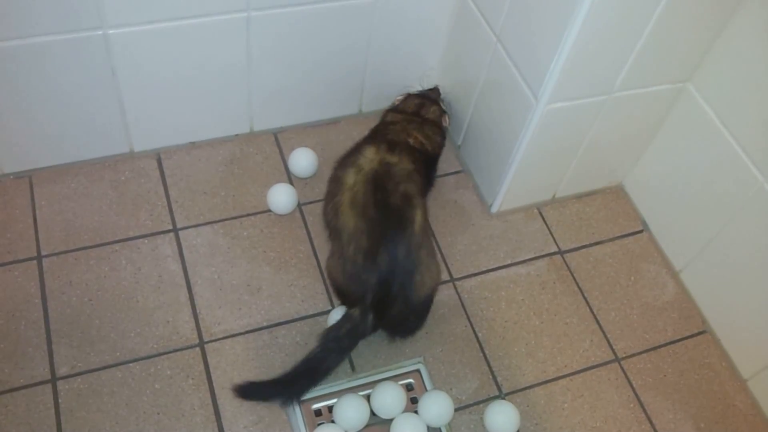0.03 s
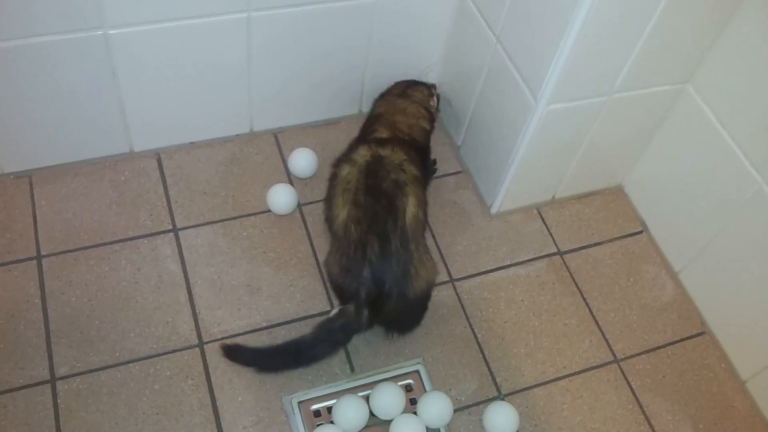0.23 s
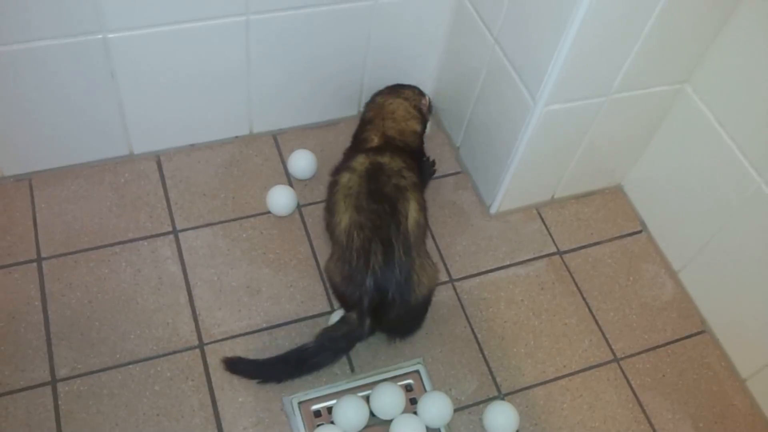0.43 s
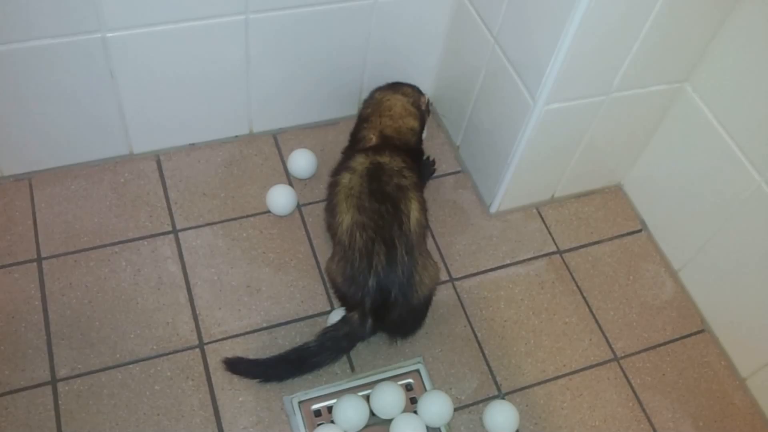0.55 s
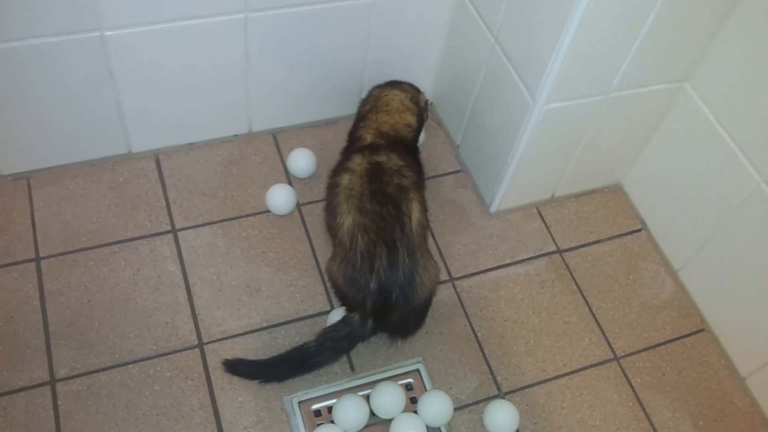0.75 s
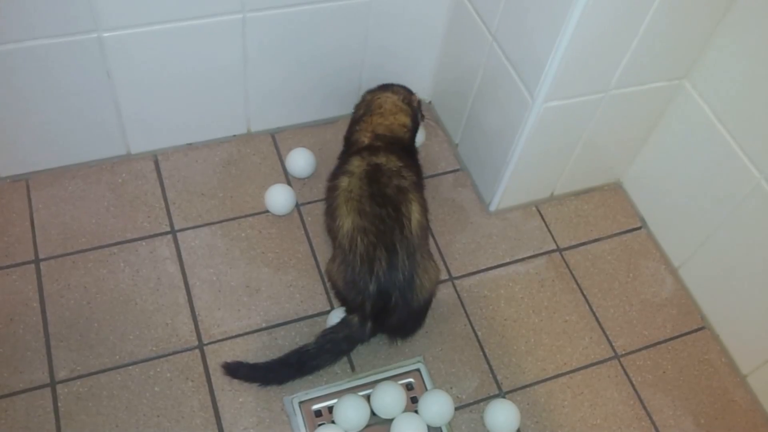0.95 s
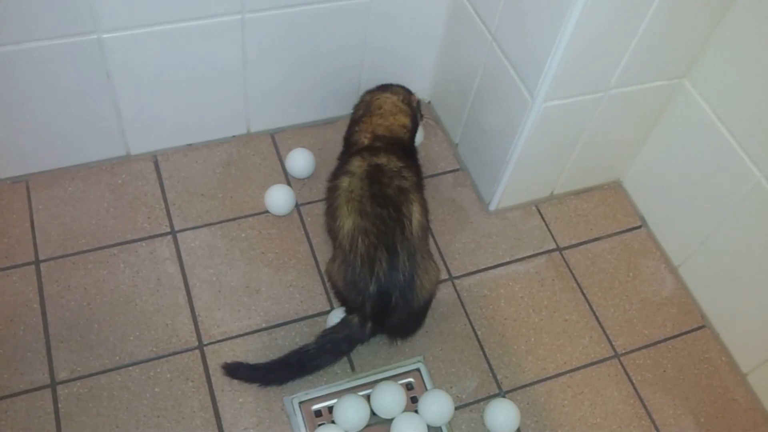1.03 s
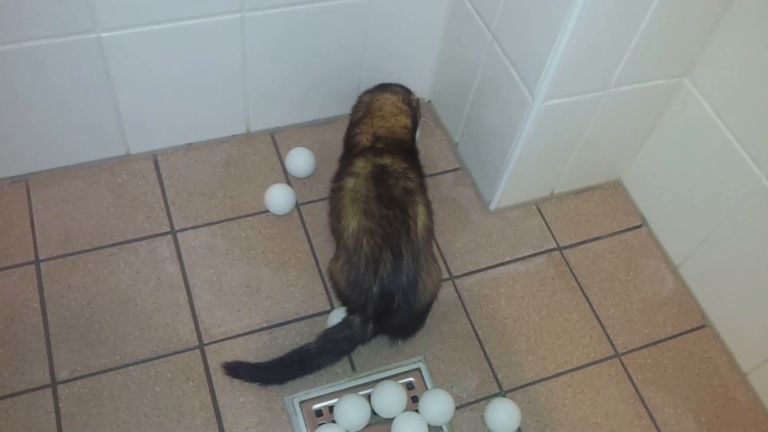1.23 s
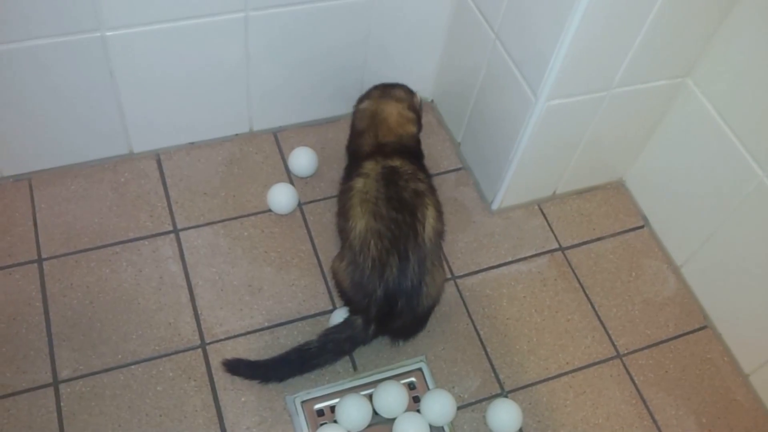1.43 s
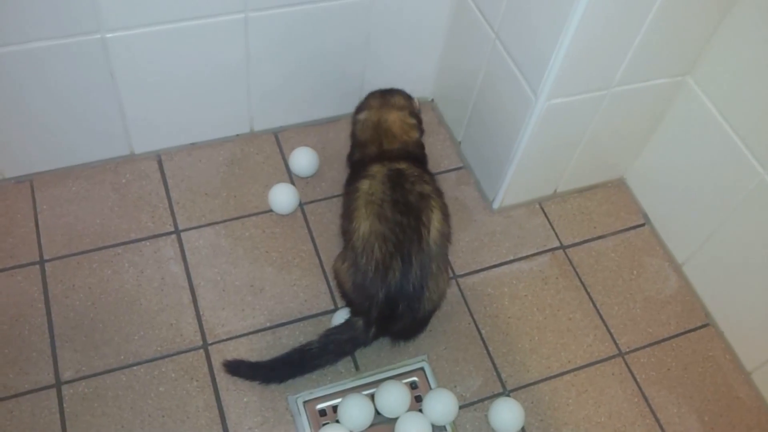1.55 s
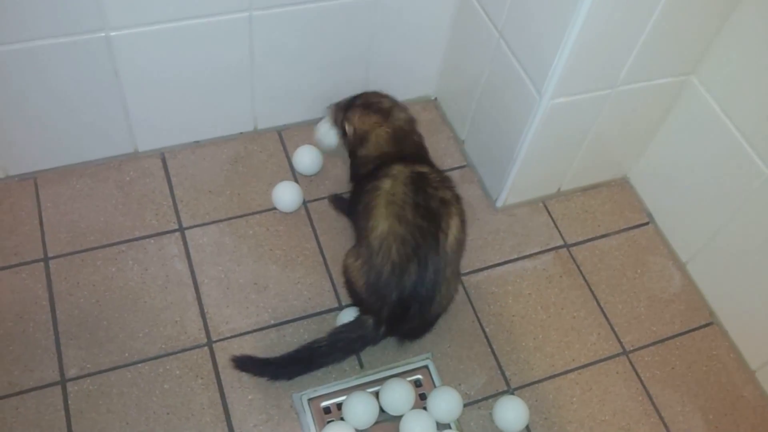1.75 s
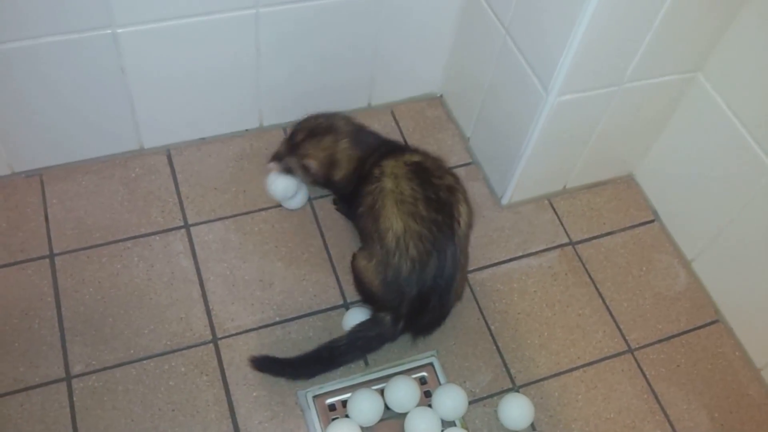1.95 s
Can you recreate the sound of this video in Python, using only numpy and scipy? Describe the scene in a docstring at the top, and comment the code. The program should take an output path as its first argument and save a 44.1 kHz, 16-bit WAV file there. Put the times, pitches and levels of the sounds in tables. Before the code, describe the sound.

A ping-pong ball clacks on tiles in an echoing room, with light claw scratching between hits.

```python
"""A ferret and a ping-pong ball

A ferret paws at the hollow ball in the corner of a small tiled room. The ball clacks on wall and
floor, twice very hard, and rolls a little; claws scratch and paws rub on the tiles in between.
The room rings brightly, and the two unequal microphone openings overload on the hard clacks."""
import sys
import numpy as np
from scipy import signal
from scipy.fft import rfft, irfft, next_fast_len
from scipy.io import wavfile

SR = 44100
rng = np.random.default_rng(int(sys.argv[2]) if len(sys.argv) > 2 else 0)


def waveform_to_disk(signal):
    """Save audio, clipped to [-1, 1], as 16-bit WAV at the path in sys.argv[1]."""
    frames = np.transpose(np.atleast_2d(signal))
    scaled = np.clip(frames, -1, 1) * 32767
    samples = np.round(scaled).astype(np.int16)
    wavfile.write(sys.argv[1], SR, samples)


N = 88200

# The ball's hollow note against the tiles. Each row: pitch in Hz, width in Hz, level in dB.
HOLLOW_NOTE = [(1132, 153, 49), (1420, 400, -19)]


def ball_clacks():
    """Each hit on the tiles is its own mix of hollow knock, ringing shell, dull tap and bright click."""
    # Each row: start in seconds, knock in dB, shell in dB, tap in dB, tap pitch in Hz, click in dB,
    # the click's treble tilt in dB per octave, direct sound (heard before any echo) in dB.
    hits = [(0.141, 10, -13, 10, 1260, 2, 5, -18.5), (0.2237, 27, 30, -10, 2570, 30, 2, -8.5),
            (0.7974, 28, 35.5, 32.5, 3840, 32, -5.5, -0.5), (0.8763, 2, 3, 11, 2500, 11, 2, -4),
            (0.91, -3, -6, 4, 2550, 14.5, -3, -1.5), (1.055, 1, -3, -1, 3470, -6, -7.5, -6),
            (1.1957, -12, -10, -5, 3040, -11, 11, 4), (1.2897, -16, 7, 10.5, 2170, 16.5, 12.5, -2.5),
            (1.333, -30, -14, -14.5, 2180, -1, 9, 3.5), (1.4313, -26, -10, 1, 1620, 6.5, 7, 0),
            (1.4382, -10, -6, 4.5, 4000, -21, 6, -4), (1.552, -23, -22, -5, 650, -13, 0, -27)]
    # The notes of the thin shell. Each row: pitch in Hz, width in Hz, level in dB.
    shell_notes = [(2450, 77, -33), (3408, 180, 5.5), (3767, 210, -3.5), (4710, 560, 2), (5410, 600, -3.5),
                   (5972, 84, -4.5), (7047, 210, -6.5)]
    # The tone of the tap and of the click. Each row: frequency in Hz, level in dB.
    tap_tone = [(100, -22), (400, -32), (800, -6.5), (1400, 5.5), (2000, -3), (2900, -3.5), (4200, -5),
                (6000, -33.5), (14000, -19.5)]
    click_tone = [(500, -74.5), (4000, -2), (6500, -10), (8000, -7), (9300, -0.5), (10400, 5.5), (12300, 2),
                  (14500, -16)]
    tap_width, tap_ring_db = 0.28, 1.5  # width as a share of the pitch; level against the dull pulse
    tilt_above_hz = 8000
    knock, shell, dull = ring(HOLLOW_NOTE), ring(shell_notes), pulse(tap_tone)
    click_fade = fade(np.arange(len(dull)) / SR, fade_s=0.0081)
    out = np.zeros((2, N))
    for start, knock_db, shell_db, tap_db, tap_hz, click_db, tilt_db, direct_db in hits:
        tilted = [(hz, db + tilt_db * np.log2(max(hz / tilt_above_hz, 1))) for hz, db in click_tone]
        click = through(rng.standard_normal(len(dull)) * click_fade, pulse(tilted))
        tap = dull + amp(tap_ring_db) * ring([(tap_hz, tap_width * tap_hz, 0)])
        parts = [(knock_db, knock), (shell_db, shell), (tap_db, tap), (click_db, click)]
        clack = sum(amp(db) * part / np.linalg.norm(part) for db, part in parts)
        add(out, start, signal.fftconvolve(clack, room_echo(direct_db), axes=1))
    return out


def claw_scratches():
    """Claws catch and slip on tile: a bright scuffing with short, stronger scratches."""
    # Single scratches. Each row: middle in seconds, half length in seconds, level in dB.
    strokes = [(0.402, 0.0076, -17), (0.497, .004, -17.5), (0.541, 0.0052, -15.5), (0.579, 0.0039, -13.5),
               (.718, 0.0058, -19), (.740, 0.0016, -13), (0.772, 0.0027, -23.5), (1.056, 0.0061, -18),
               (1.132, 0.0042, -19.5), (1.2877, 0.0017, -17)]
    # How strongly the claws scuff. Each row: time in seconds, level in dB.
    scuff_levels = [(0, -40.5), (.06, -44), (.12, -36), (.16, -37), (.28, -31), (.35, -16.5), (.45, -22.5),
                    (.6, -29), (.67, -26.5), (.76, -51), (.85, -18.5), (1.0, -32.5), (1.17, -72),
                    (1.3, -28), (1.48, -65), (1.62, -54), (2, -54)]
    # The tone of claw on tile. Each row: frequency in Hz, level in dB.
    claw_tone = [(500, -20.5), (3000, -24), (6300, -13.5), (7700, -10.5), (9300, -4), (11000, 6.5),
                 (12400, 0), (14500, -19)]
    pressure = sum(swell(middle, half_length, db) for middle, half_length, db in strokes)
    scratches = through(pressure * rng.standard_normal(N), room_echo(direct_db=-3.5))
    scuff = through(friction() * level_curve(scuff_levels), room_echo())
    return through(scuff + scratches, pulse(claw_tone))


def paw_rubs():
    """Soft paws rub the floor, with a few strokes that each have their own pitch."""
    # How strongly the paws rub. Each row: time in seconds, level in dB.
    rub_levels = [(0, -25.5), (.12, -57), (.17, -20), (.35, -20.5), (.6, -28), (.78, -34.5), (.95, -43),
                  (1.16, -23), (1.21, -23.5), (1.26, -84), (1.4, -33), (1.55, -41), (1.65, -50), (2, -45.5)]
    # The tone of paw on tile. Each row: frequency in Hz, level in dB.
    paw_tone = [(60, -70), (250, -24), (550, -1.5), (1100, 5), (1800, 4.5), (2500, -2.5), (3600, -0.5),
                (5000, -13), (7000, -38), (14000, -11)]
    # Single strokes. Each row: middle in seconds, half length in seconds, pitch in Hz, level in dB.
    strokes = [(0.161, 0.02, 1550, -19.5), (0.362, 0.037, 2490, -18.5), (0.59, 0.051, 670, -26),
               (0.746, 0.016, 900, -22), (1.2, 0.017, 3240, -18), (1.214, 0.015, 520, -29.5)]
    stroke_width = 0.33  # as a share of the pitch
    rub = through(friction() * level_curve(rub_levels), pulse(paw_tone))
    for middle, half_length, hz, db in strokes:
        slips = friction() * swell(middle, half_length, db)
        rub += through(slips, ring([(hz, stroke_width * hz, 0)]))
    return through(rub, room_echo())


def ball_rolling():
    """The rough tile keeps the rolling ball's hollow note going."""
    # How strongly the ball rumbles. Each row: time in seconds, level in dB.
    roll_levels = [(0, -47), (.13, -41), (.2, -41), (.5, -36), (.78, -25.5), (.95, -24.5), (1.07, -22),
                   (1.17, -40), (1.3, -71), (1.5, -73), (2, -76)]
    bumps = friction() * level_curve(roll_levels)
    return through(through(bumps, ring(HOLLOW_NOTE)), room_echo())


def room_echo(direct_db=-18.5, size=30000):
    """The room's stereo answer to a click: direct sound, a quick flutter in the corner, a long tail."""
    # How long the tiled room rings. Each row: frequency in Hz, seconds to fade by 60 dB.
    ring_times = [(150, 0.13), (1100, 0.84), (3500, 0.57), (7000, 0.51), (11000, 0.4), (15000, 0.44)]
    tail_db, flutter_db = -5, -2
    hz, t, bands = signal.stft(rng.standard_normal((2, size)), SR, nperseg=256)
    fading_bands = bands * fade(t, value_at(ring_times, hz)[:, None])
    tail = signal.istft(fading_bands, SR, nperseg=256)[1][:, :size]
    flutter = rng.standard_normal((2, size)) * fade(np.arange(size) / SR, fade_s=0.18)
    echo = amp(tail_db) * tail / np.linalg.norm(tail[0])
    echo += amp(flutter_db) * flutter / np.linalg.norm(flutter[0])
    echo[:, 0] += amp(direct_db)
    return echo


def background():
    """A steady hiss and a faint low hum."""
    # The tone of the hiss. Each row: frequency in Hz, level in dB.
    hiss_tone = [(18, -52), (30, -24), (128, -19), (145, -9), (226, -12), (398, -12), (477, -5),
                 (668, -12.5), (780, -10), (2140, -18), (2500, -18), (2840, -18), (14500, -19)]
    hiss_db, hum_db, hum_hz = -38, -65, 156.4
    hiss = unit(through(rng.standard_normal((2, N)), pulse(hiss_tone)))
    hum = np.sqrt(2) * np.sin(2 * np.pi * hum_hz * np.arange(N) / SR)
    return amp(hiss_db) * hiss + amp(hum_db) * hum


def friction(slips_per_s=1600, spread_db=4.5):
    """Surfaces rubbing together make many tiny slips of uneven size."""
    slips = rng.random(N) < slips_per_s / SR
    return unit(slips * rng.choice([-1, 1], N) * amp(spread_db * rng.standard_normal(N)))


def amp(db):
    """Turn decibels into a number to multiply a sound by."""
    return 10 ** (np.asarray(db) / 20)


def unit(x):
    """Scale a sound to an average strength (rms) of 1."""
    return x / np.sqrt(np.mean(x ** 2) + 1e-20)


def fade(t, fade_s):
    """Die away by 60 dB every fade_s seconds."""
    return amp(-60 * t / fade_s)


def swell(middle_s, half_length_s, db):
    """A smooth, bell-shaped rise and fall."""
    return amp(db) * np.exp(-((np.arange(N) / SR - middle_s) / half_length_s) ** 2)


def value_at(points, hz):
    """Read between (Hz, value) points, with octaves evenly spaced."""
    frequencies, values = np.transpose(points)
    return np.interp(np.log(hz + 1), np.log(frequencies + 1), values)


def level_curve(points):
    """Join (seconds, dB) points into a volume for every sample."""
    return amp(np.interp(np.arange(N) / SR, *np.transpose(points)))


def add(track, start_s, sound):
    """Mix a sound into the track at its start time."""
    part = track[..., round(start_s * SR):][..., :sound.shape[-1]]
    part += sound[..., :part.shape[-1]]


def through(x, response):
    """Pass a sound through a filter or echo, keeping its length."""
    return signal.fftconvolve(np.atleast_2d(x), np.atleast_2d(response), axes=1)[:, :x.shape[-1]]


def tone_filter(points, size=2048):
    """A filter whose tone follows (Hz, dB) points."""
    gains = amp(value_at(points, np.fft.rfftfreq(size, 1 / SR)))
    cepstrum = irfft(np.log(gains))
    # Fold the second half onto the first, so nothing sounds before the hit.
    cepstrum[1:size // 2] *= 2
    cepstrum[size // 2 + 1:] = 0
    return irfft(np.exp(rfft(cepstrum)))


def pulse(points):
    """A short pulse of energy 1 whose tone follows (Hz, dB) points."""
    response = tone_filter(points)
    return response / np.linalg.norm(response)


def ring(notes, size=2048):
    """Ringing of energy 1 from (Hz, width in Hz, dB) notes; narrower notes ring longer."""
    hz = np.fft.rfftfreq(size, 1 / SR)
    spectrum = sum((-1) ** k * amp(db) * 1j * hz * width / (pitch ** 2 - hz ** 2 + 1j * hz * width)
                   for k, (pitch, width, db) in enumerate(notes))
    ringing = irfft(spectrum)
    return ringing / np.linalg.norm(ringing)


def scene():
    """Ball and ferret as the two microphone openings hear them, over the background."""
    # The tone of each opening. Each row: frequency in Hz, level in dB.
    left_tone = [(1200, -4), (2700, -4.5), (4200, -7.5), (6400, -5), (8000, 6.5), (10000, 7), (14500, 8)]
    right_tone = [(1200, -6), (2700, -2.5), (4200, -2), (6400, -1.5), (8000, -2), (10000, -12),
                  (14500, -10.5)]
    openings = np.array([tone_filter(left_tone), tone_filter(right_tone)])
    play = ball_clacks() + claw_scratches() + paw_rubs() + ball_rolling()
    return through(play, openings) + background()


def record(dry):
    """The recorder clips loud peaks, briefly turns down volume and bass, and loses the top treble."""
    full_scale, top_hz = 0.89, 14600
    react_s, hold_s = 0.078, 0.073
    dip_db, dip_knee = 4.5, 0.093  # deepest dip; share of overloaded time that gives most of it
    bass_hz, most_bass_cut = 210, 0.73
    too_loud = np.mean(np.abs(dry) > full_scale, axis=0)
    # The recorder reacts a moment after an overload, then gradually forgets it.
    since_reacting = np.arange(SR // 2) / SR - react_s
    memory = (since_reacting > 0) * np.exp(-np.abs(since_reacting) / hold_s)
    overload = np.abs(through(too_loud, memory / memory.sum()))
    bass_cut = most_bass_cut * np.tanh(15 * overload)
    bass = signal.sosfiltfilt(signal.butter(4, bass_hz, fs=SR, output="sos"), dry)
    turned_down = (dry - bass_cut * bass) * amp(-dip_db * np.tanh(overload / dip_knee))
    clipped = np.clip(turned_down, -full_scale, full_scale)
    size = next_fast_len(N + SR // 10)
    below_top = np.fft.rfftfreq(size, 1 / SR) < top_hz
    return irfft(rfft(clipped, size) * below_top, size)[:, :N]


dry = scene()
out = record(dry)
waveform_to_disk(out)
```